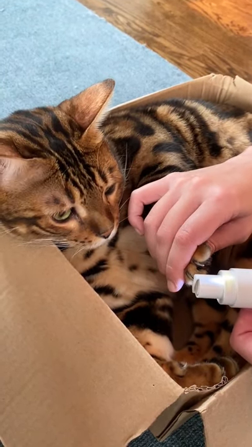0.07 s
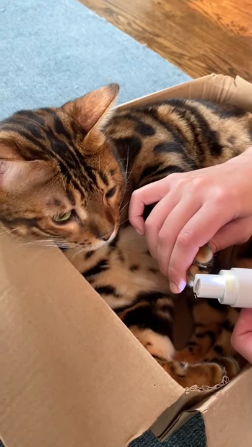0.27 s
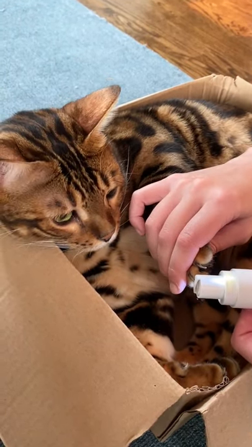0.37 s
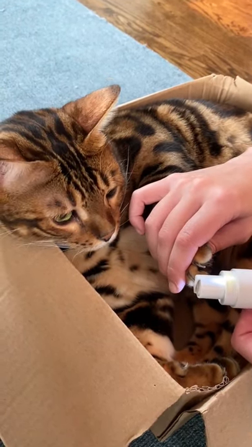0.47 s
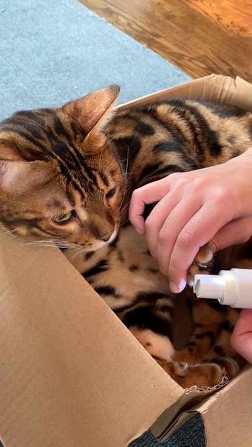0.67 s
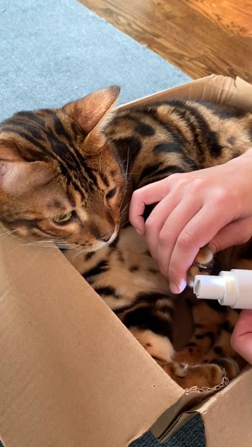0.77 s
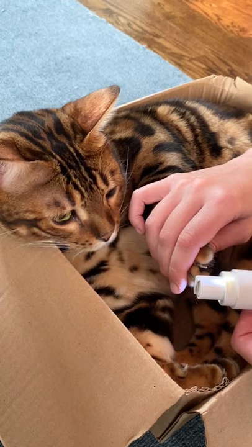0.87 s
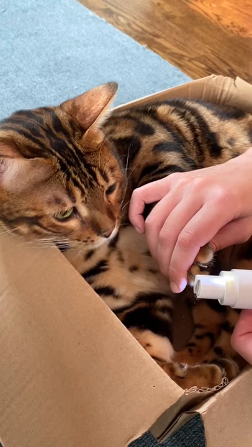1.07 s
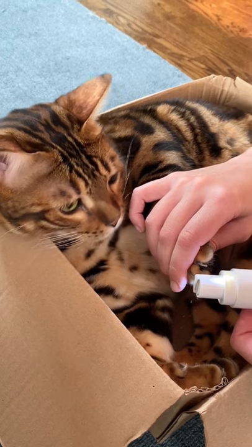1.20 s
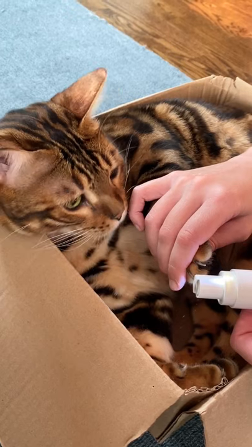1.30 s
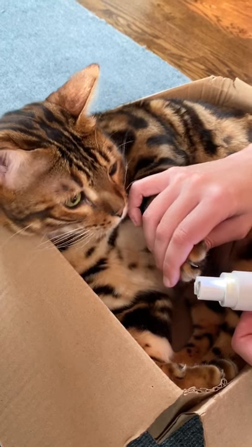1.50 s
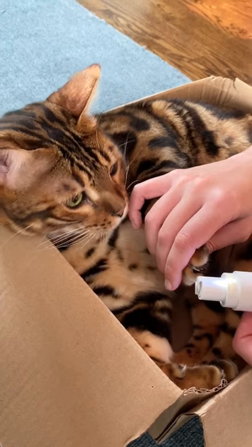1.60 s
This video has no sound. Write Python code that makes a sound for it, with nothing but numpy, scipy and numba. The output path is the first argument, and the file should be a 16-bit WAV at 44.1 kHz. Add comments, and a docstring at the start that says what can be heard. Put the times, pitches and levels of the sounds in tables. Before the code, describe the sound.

A small electric nail grinder rasps twice against a cat's claw, briefly and then longer.

```python
"""A quiet room, a phone close to a small electric nail grinder, cardboard walls and a hand near by.
The drum is pressed twice against a cat's claw. The same grit passes on every turn, so the rasp is a
buzz that rings claw and housing. The motor whines throughout, slows under the load and recovers.
Two microphone ports pick it up, with close reflections, a faint room tail and a low rumble."""
import sys
import numpy as np
from scipy import signal
from scipy.fft import rfft, irfft, next_fast_len
from scipy.io import wavfile
from scipy.ndimage import uniform_filter1d, map_coordinates
from numba import njit

SR = 44100
rng = np.random.default_rng(int(sys.argv[2]) if len(sys.argv) > 2 else 0)


def wav_record(signal):
    """Record a signal, one row per channel, as 16-bit PCM in the file named by sys.argv[1]."""
    frames = np.transpose(np.atleast_2d(signal))
    bounded = np.clip(frames, -1, 1)
    # unit amplitude maps onto the largest positive 16-bit level
    quanta = np.round(bounded * 32767).astype(np.int16)
    wavfile.write(sys.argv[1], SR, quanta)


N = 72765
T = np.arange(N) / SR
FFT_SIZE = next_fast_len(2 * N)
HZ = np.maximum(np.arange(FFT_SIZE // 2 + 1) * SR / FFT_SIZE, 1)

# Room tone. Each row: frequency in Hz, relative spectral level in dB.
ROOM_SPECTRUM = [(20,-56),(40,-5),(60,4.5),(100,-0.5),(200,-4),(400,-8),(800,-19.5),(1600,-28.5),(5000,-30),(16000,-26)]
# The drum's speed. Each row: time in seconds, turns per second.
DRUM_SPEED = [(0.17, 112.2), (0.19, 112.0), (0.23, 105.6), (0.29, 100.2), (0.344, 103.3), (0.394, 109.3),
              (0.444, 110.9), (0.558, 111.8), (0.604, 107.1), (0.65, 105.8), (0.7, 107.4), (0.736, 107.4),
              (0.782, 104.5), (0.826, 106.5), (0.886, 101.4), (0.932, 101.8), (0.974, 98.8), (1.022, 100.5),
              (1.056, 100.2), (1.106, 103.7), (1.214, 100.3), (1.246, 101.2), (1.296, 109.2),
              (1.338, 110.7), (1.45, 111.6)]
# The free-running motor's lowest line, then the rest. Each row: frequency in Hz, relative level in dB.
LOW_WHINE = [(1680, -85)]
UPPER_WHINE = [(2126, -82), (2353, -65), (3025, -82), (3688, -83), (4021, -76), (4360, -77), (5039, -85),
               (6385, -85), (7843, -86), (10729, -84), (11068, -90), (11429, -83), (12096, -88),
               (15348, -90), (15461, -86), (15692, -90)]
# The two touches. Each row: time in seconds, then relative levels of rasp, claw and treble in dB.
SHORT_TOUCH = [(.193,-75,-72,-66),(.196,-46.5,-50,-45.5),(.212,-51.5,-39,-42.5),(.222,-30.5,-43,-27.5),(.242,-35.5,-35.5,-37.5),(.28,-31,-43.5,-34.5),(.315,-35.5,-45.5,-38),(.354,-42,-45.5,-39),(.372,-58.5,-65,-65),(.43,-61,-71,-89),(.52,-76,-81,-93)]
LONG_TOUCH = [(.565,-83,-74,-63),(0.569,-49,-51,-53),(0.599,-47.5,-43.5,-51),(.625,-51.5,-48,-50),(0.641,-42,-45,-41),(0.666,-52,-53,-55),(.698,-49,-53.5,-49.5),(0.699,-42,-49.5,-41),(.732,-40,-51.5,-38),(0.751,-36,-44,-32.5),(.778,-35,-48,-40),(.814,-51,-54.5,-48.5),(0.835,-37.5,-43,-38),(.864,-33.5,-42.5,-35),(0.915,-37,-47,-39.5),(0.946,-34,-44.5,-35.5),(1.036,-35.5,-44.5,-35),(1.089,-45.5,-45,-38.5),(1.11,-40.5,-43.5,-36),(1.168,-36.5,-45.5,-34.5),(1.242,-40,-48,-36.5),(1.258,-60.5,-59,-71),(1.3,-64,-77,-73),(1.351,-66,-80,-83)]
# Resonances of drum and housing. Each row: frequency in Hz, width in Hz, relative level in dB.
RASP_MODES = [(136,360,-25.5),(761,145,-19),(890,370,-24),(1290,260,-28),(1780,1040,-18.5),(2820,120,-7),(3121,353,0.5),(4031,350,3.5),(4515,340,6.5),(4900,270,3),(5290,520,2.5),(6252,500,-5)]
TREBLE_MODES = [(8228,370,-2.5),(9400,690,-10.5),(10144,313,1.5),(10700,500,-2.5),(11550,710,-2.5),(12250,340,-2.5),(13100,760,-6),(15100,610,-13),(15000,230,-6.5)]
# The claw's main resonance as it is pressed and turned. Each row: time in seconds, frequency in Hz.
CLAW_PITCH = [(.2,2183),(.28,2103),(.36,2175),(.58,2187),(.67,2230),(.76,2110),(.86,2236),(1.0,2110),(1.1,2020),(1.23,2074)]
# Its higher resonances. Each row: frequency in Hz, width in Hz, level in dB against the main one.
CLAW_MODES = [(5180,580,-0.5),(8593,390,1)]
# The force behind each layer. Each holds: gain, swing once a turn, swing twice a turn, all in dB.
RASP_FORCE = dict(gain_db=0.5, wobble_db=3.7, oval_db=-1.57)
CLAW_FORCE = dict(gain_db=5, wobble_db=1.5, oval_db=-1.5)
TREBLE_FORCE = dict(gain_db=1.5, wobble_db=3, oval_db=-0.5)
# Phase between the microphone ports. Each row: frequency in Hz, lead of the left in radians.
PORT_PHASE = [(100,0),(2400,0),(3000,.8),(3700,.4),(5500,.15),(6200,1.8),(6900,3.1),(7550,3.2),(8500,4.3),(9600,5.8),(10800,6.3),(12000,7.8),(12800,8.7),(13150,9.35),(14100,9.5),(14700,10.6),(16000,12)]
# Balance between the ports. Each row: frequency in Hz, left minus right in dB.
PORT_BALANCE = [(100,8),(2400,-5.5),(3200,-1),(4400,-6.5),(5400,2),(6500,-0.5),(16000,0.5)]

GRAINS_PER_TURN = 400
IDLE_SPEED, LOADED_SPEED = 111.25, 103.5  # turns per second: running free, pressed firmly


def amp(db):
    """Decibels to gain."""
    return 10 ** (np.asarray(db) / 20)


def unit(x):
    """Scale to rms 1."""
    return x / np.sqrt(np.mean(x ** 2))


def curve(at, rows, column=1):
    """Straight lines through one column of a table."""
    rows = np.array(rows)
    return np.interp(at, rows[:, 0], rows[:, column])


def shape(x, response):
    """Filter by a frequency response."""
    return irfft(rfft(x, FFT_SIZE) * response, FFT_SIZE)[..., :N]


def drift(rate_hz):
    """A smooth random wander of rms 1."""
    return unit(map_coordinates(rng.standard_normal(256), [T * rate_hz], mode="mirror"))


def ring(x, modes):
    """Resonances that ring only after they are struck (minimum phase)."""
    power = sum(amp(db) ** 2 / (1 + 2 * ((HZ - hz) / width) ** 2) ** 3 for hz, width, db in modes)
    cepstrum = irfft(np.log(np.sqrt(power) + 1e-6), FFT_SIZE)
    cepstrum[1:FFT_SIZE // 2] *= 2
    cepstrum[FFT_SIZE // 2 + 1:] = 0
    return shape(x, np.exp(rfft(cepstrum)))


def room_rumble(level_db=-64.5, wide_above_hz=420):
    """Steady room tone, alike at both ports in the bass."""
    gain = amp(curve(np.log(HZ), [(np.log(hz), db) for hz, db in ROOM_SPECTRUM]))
    mid = shape(rng.standard_normal(N), gain)
    side = shape(rng.standard_normal(N), gain * HZ / (HZ + wide_above_hz))
    return amp(level_db) * unit(np.array([mid + side, mid - side]))


def motor(turns, whine_gain_db=2.5, waver_db=0.5, brush_db=-77.5):
    """Clean lines follow the shaft speed, over a faint high brush rattle that repeats every turn."""
    shaft_time = turns / DRUM_SPEED[0][1]  # runs slow under load
    whine = 0
    for hz, db in LOW_WHINE + UPPER_WHINE:
        peak = np.sqrt(2) * amp(db + waver_db * drift(12.1))
        whine += peak * np.sin(2 * np.pi * (hz * shaft_time + rng.random()))
    one_turn = rng.standard_normal(400)
    brushes = map_coordinates(one_turn, [turns * len(one_turn)], mode="grid-wrap")
    return amp(whine_gain_db) * whine + amp(brush_db) * unit(ring(brushes, TREBLE_MODES))


def grit(turns, spread_db=6, tracks_per_s=6.12):
    """Grains on the drum come round every turn; the claw slides slowly on to new tracks of them."""
    size = (64, GRAINS_PER_TURN)
    signs = rng.choice([-1., 1.], size)
    grains = signs * amp(spread_db * np.minimum(rng.exponential(size=size), 5))
    grains /= np.sqrt(np.mean(grains ** 2, axis=1, keepdims=True))
    return unit(map_coordinates(grains, [T * tracks_per_s, turns * GRAINS_PER_TURN], mode="grid-wrap"))


def contact(scrape, turns, chips, gain_db, wobble_db, oval_db):
    """Force on the claw: grit and a share of fresh chips, pressed harder once and twice a turn."""
    angle = 2 * np.pi * (turns - .55)  # from the drum's high spot
    swing = 1 + 0.059 * np.clip(curve(T, DRUM_SPEED) - LOADED_SPEED, 0, 7)  # wider under light load
    press = amp(wobble_db * swing * np.cos(angle) + oval_db * np.cos(2 * angle))
    press /= np.sqrt(uniform_filter1d(press ** 2, size=1280))
    return amp(gain_db) * unit(press * (scrape + chips * rng.standard_normal(N)))


@njit
def bandpass(x, hz, width):
    """A resonance whose centre and width may move."""
    out, band_state, low_state = np.empty(len(x)), 0., 0.
    for i in range(len(x)):
        tuning, damping = np.tan(np.pi * hz[i] / SR), width[i] / hz[i]
        band = (band_state + tuning * (x[i] - low_state)) / (1 + tuning * (tuning + damping))
        band_state = 2 * band - band_state
        low_state += 2 * tuning * band
        out[i] = damping * band
    return out


def claw(force):
    """The claw rings; load damps its main resonance."""
    hz = curve(T, CLAW_PITCH)
    speed_lost = np.maximum(IDLE_SPEED - curve(T, DRUM_SPEED), 0)
    width_hz = 180 + 30.5 * speed_lost
    main = bandpass(bandpass(force, hz, width_hz), hz, width_hz)
    return main + ring(force, CLAW_MODES)


def touches(column, release_s=0.041):
    """Gain of one layer through both touches; the last light brushing of each dies away."""
    gain = 0
    for rows in (SHORT_TOUCH, LONG_TOUCH):
        start, end = rows[0][0], rows[-1][0]
        release = np.exp(-np.maximum(T - end, 0) / release_s)
        gain += amp(curve(T, rows, column)) * (T > start) * release
    return gain


def grinding(turns, tall_db=14.5, tall_at_turns=0.11, tall_width_turns=0.075):
    """The passing grit rings drum, housing and claw; a patch of tall grains strikes once a turn."""
    scrape = grit(turns)
    from_patch = (turns - tall_at_turns + .5) % 1 - .5
    patch = np.exp(-(from_patch / tall_width_turns) ** 2)
    struck = unit(scrape * amp(tall_db * patch))
    rasp_force = contact(struck, turns, chips=.28, **RASP_FORCE)
    claw_force = contact(scrape, turns, chips=.28, **CLAW_FORCE)
    treble_force = contact(struck, turns, chips=.5, **TREBLE_FORCE)
    rasp = unit(ring(rasp_force, RASP_MODES)) * rasp_force.std() * touches(column=1)
    buzz = unit(claw(claw_force)) * claw_force.std() * touches(column=2)
    treble = unit(ring(treble_force, TREBLE_MODES)) * treble_force.std() * touches(column=3)
    return rasp + buzz + treble


def knock(start_s=.226, level_db=-50, decay_s=0.004, cutoff_hz=603):
    """A soft, dull bump as the drum first catches the claw."""
    thud = unit(shape(rng.standard_normal(N), 1 / (1 + (HZ / cutoff_hz) ** 2)))
    return amp(level_db) * thud * (T > start_s) * np.exp(-abs(T - start_s) / decay_s)


def rub(peak_s=.39, spread_s=.045, level_db=-65.5, hz=1210, width_hz=3900):
    """A faint swell of friction noise as the first touch ends."""
    friction = unit(ring(rng.standard_normal(N), [(hz, width_hz, 0)]))
    return amp(level_db) * friction * np.exp(-((T - peak_s) / spread_s) ** 2 / 2)


def reflections(x, t60_s, level_db, delay_s):
    """A diffuse tail off the walls, different at each port."""
    tail = rng.standard_normal((2, N)) * np.exp(-np.log(1000) * T / t60_s) * (T > delay_s)
    return amp(level_db) * shape(x, rfft(unit(tail) / np.sqrt(N), FFT_SIZE))


def hand_reflection(x, level_db=-17, delay_s=0.0011194, sway_s=.00006):
    """The moving hand mirrors the sound into each port and shifts its colour."""
    delays = [delay_s + sway_s * drift(5.9) for _ in range(2)]
    return amp(level_db) * np.array([map_coordinates(x, [(T - delay) * SR]) for delay in delays])


def microphone_ports(x):
    """Close sound reaches the two ports at different levels and phases."""
    left = amp(curve(HZ, PORT_BALANCE) / 2) * np.exp(.5j * curve(HZ, PORT_PHASE))
    return shape(x, np.array([left, 1 / left]))


def scene():
    """The grinder close to the microphone, beside a hand, in a cardboard box in the room."""
    flutter = 1 + 0.00039 * drift(24.18)
    turns = np.cumsum(curve(T, DRUM_SPEED) * flutter) / SR
    grinder = grinding(turns) + motor(turns) + knock() + rub()
    box = reflections(grinder, t60_s=0.12, level_db=-12.5, delay_s=0.0017)
    room = reflections(grinder, t60_s=0.75, level_db=-28.5, delay_s=0.017)
    return room_rumble() + microphone_ports(grinder + hand_reflection(grinder)) + box + room


def record(dry):
    """The phone cuts the top steeply above 15.9 kHz."""
    return signal.sosfilt(signal.ellip(10, .2, 70, 15900, fs=SR, output="sos"), dry)


dry = scene()
out = record(dry)
wav_record(out)
```